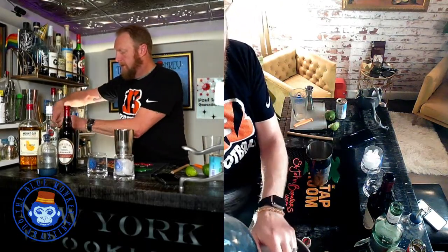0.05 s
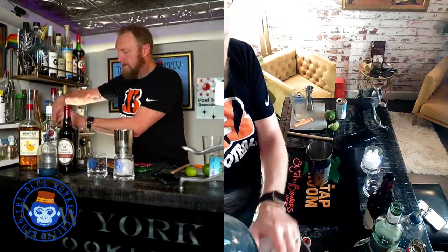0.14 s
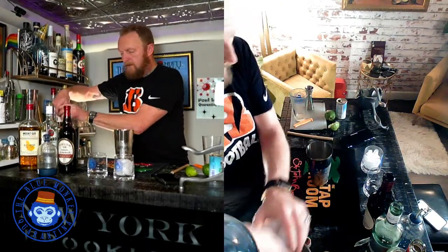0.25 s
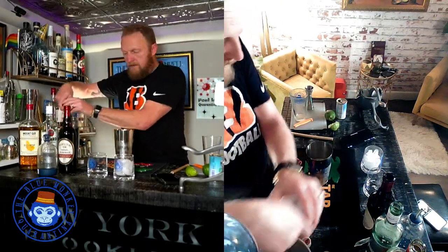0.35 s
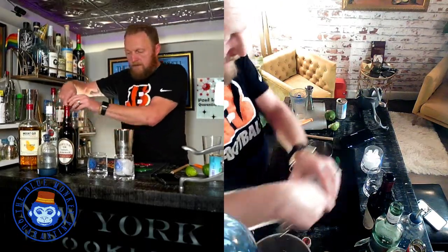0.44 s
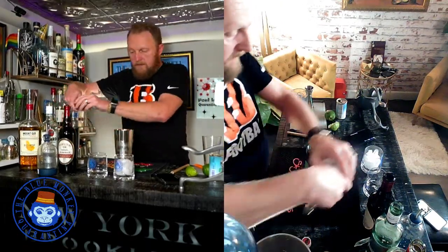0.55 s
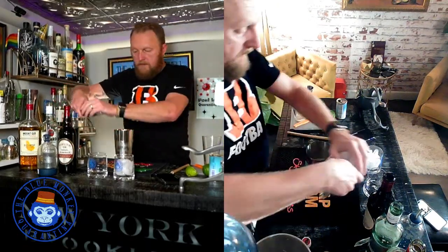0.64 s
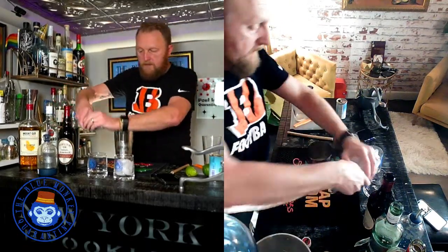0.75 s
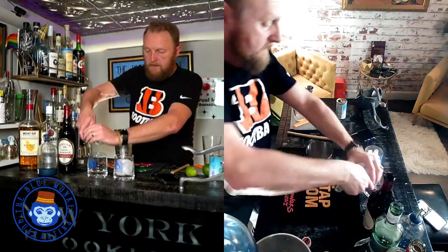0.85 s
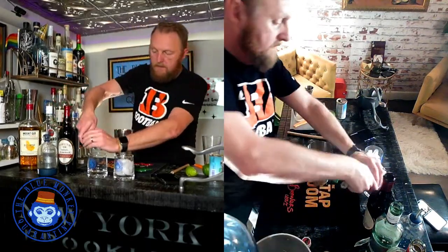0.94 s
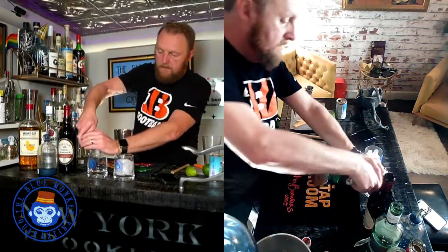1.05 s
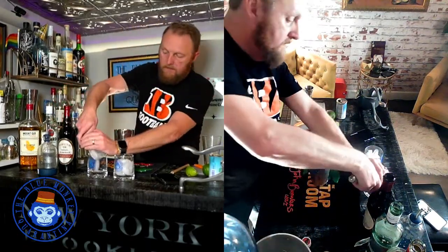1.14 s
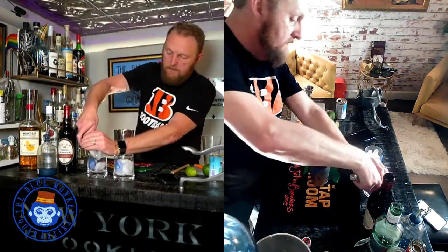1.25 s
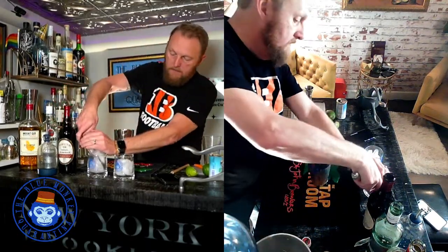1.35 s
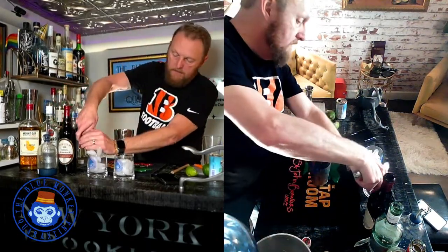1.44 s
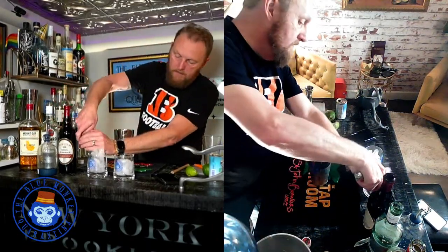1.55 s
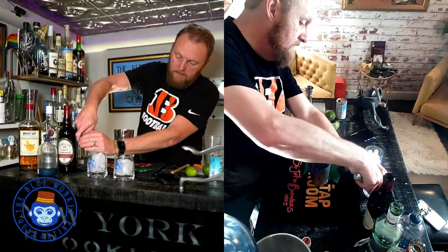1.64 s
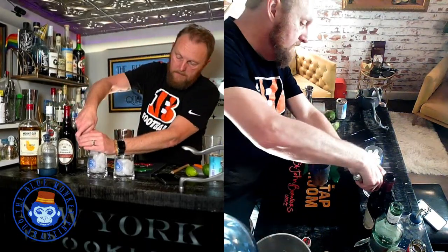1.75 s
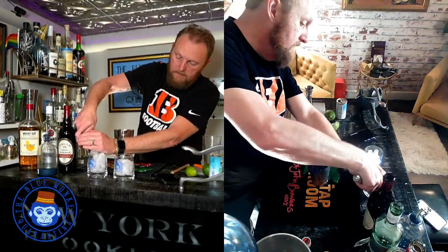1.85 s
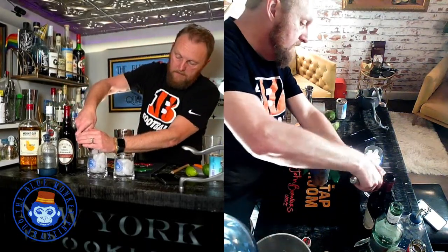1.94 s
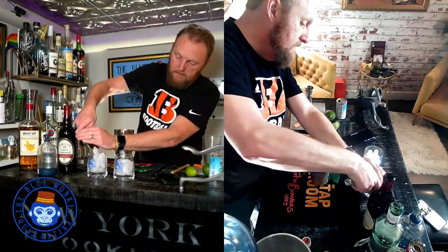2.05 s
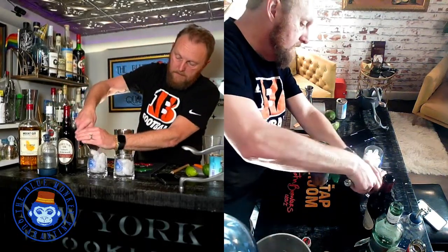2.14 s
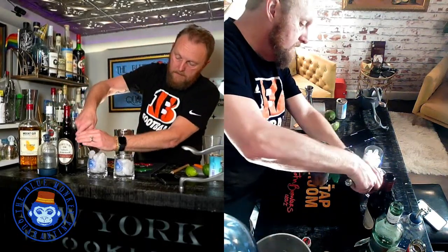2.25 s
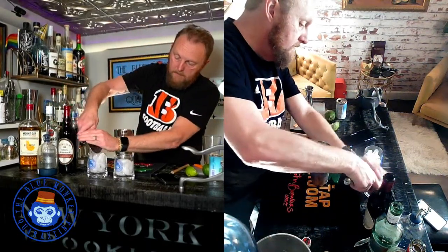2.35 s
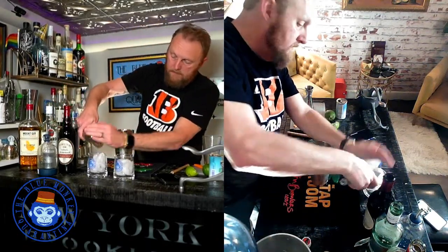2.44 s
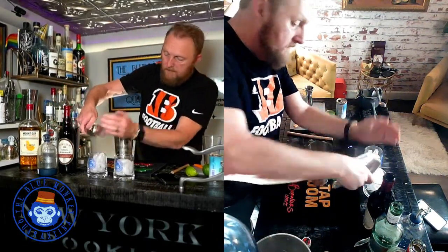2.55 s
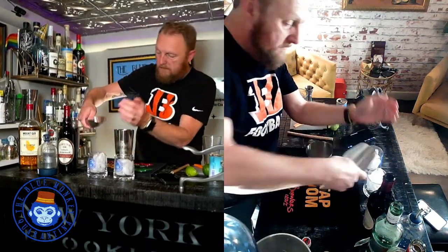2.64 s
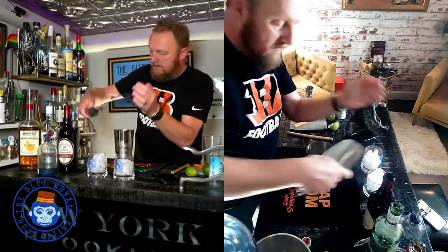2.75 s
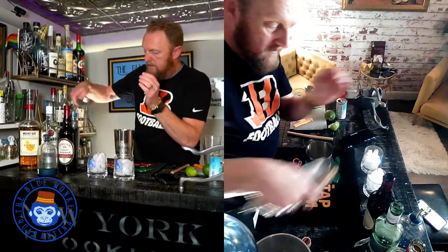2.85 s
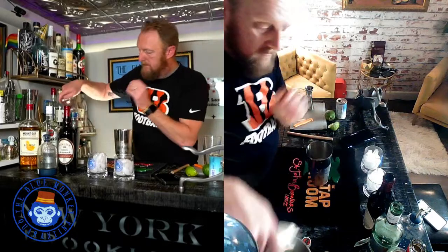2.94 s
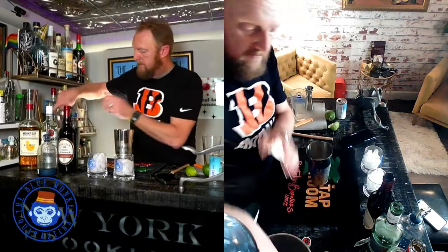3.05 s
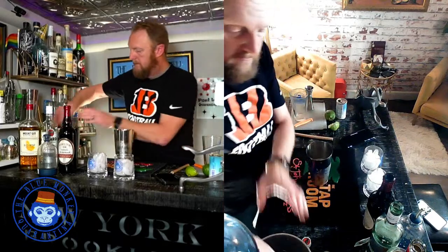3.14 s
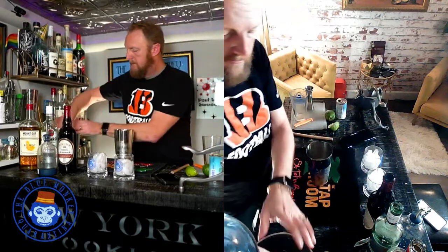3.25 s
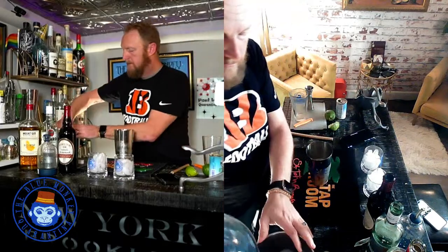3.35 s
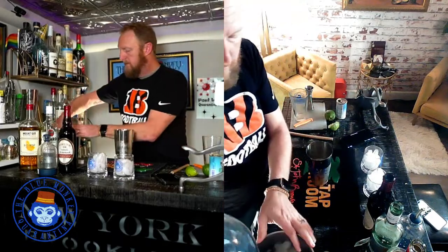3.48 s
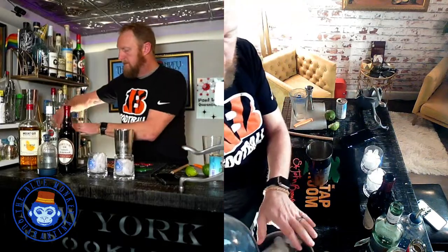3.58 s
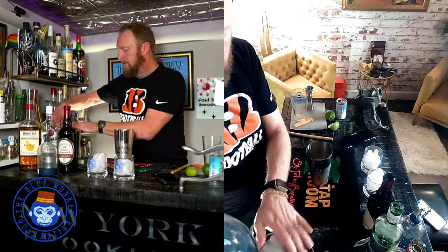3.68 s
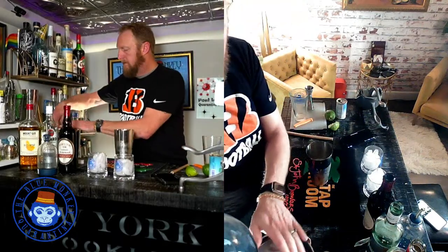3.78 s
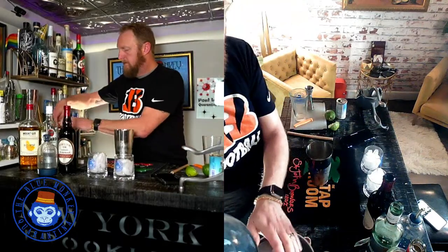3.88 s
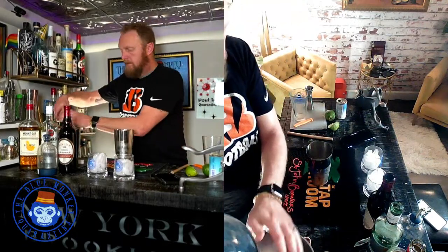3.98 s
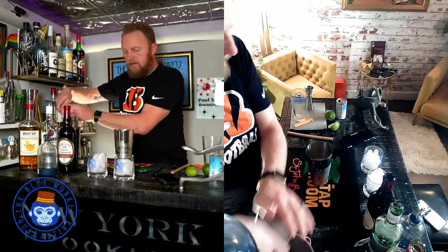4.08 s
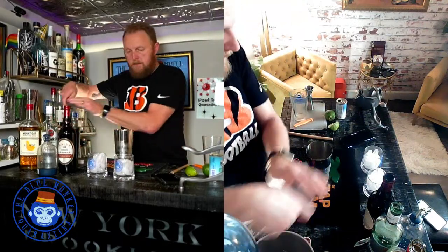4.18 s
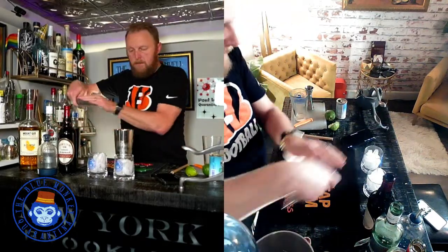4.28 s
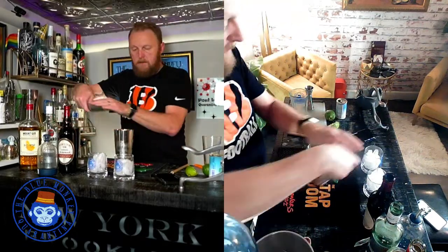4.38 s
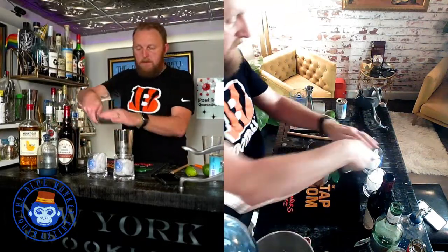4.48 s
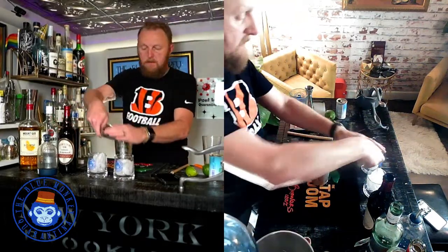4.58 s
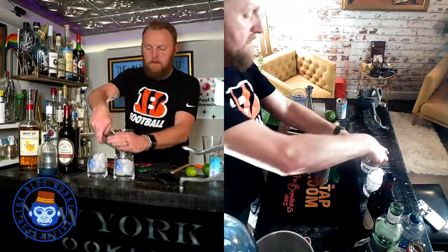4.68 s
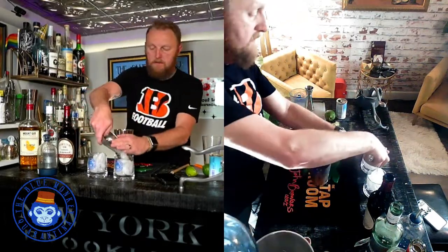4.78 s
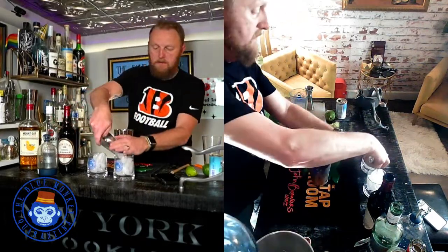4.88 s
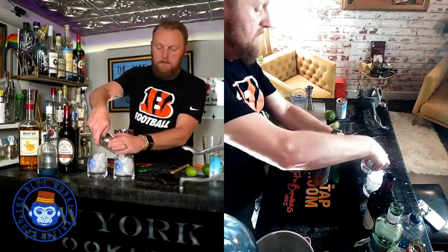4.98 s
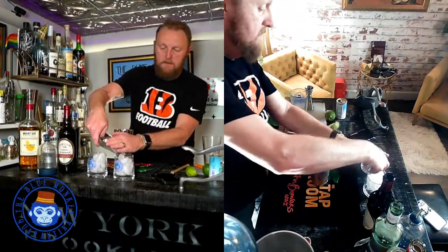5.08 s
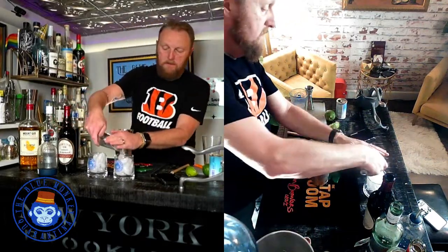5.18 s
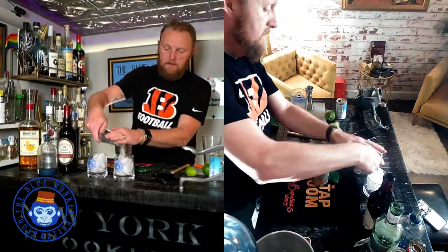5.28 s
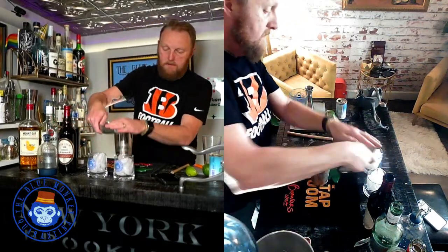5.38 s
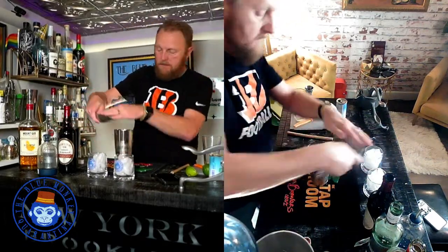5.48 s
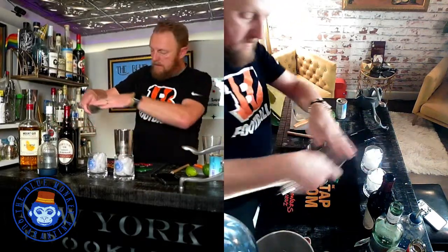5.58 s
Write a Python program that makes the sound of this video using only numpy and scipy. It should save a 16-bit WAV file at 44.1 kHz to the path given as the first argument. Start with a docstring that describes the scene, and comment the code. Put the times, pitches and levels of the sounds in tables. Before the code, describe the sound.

A small, fairly dry room with very faint low room tone, heard close up. At 0 s a fading crunch of ice in a bucket, with small cracks and dull bumps until about 0.45 s. The lifted steel scoop rings thinly and very faintly, until a little ice shifts at 1.15 s. From 1.29 to 1.85 s cubes tumble into a tumbler: hard, bright, irregular clinks over a quick rattle, the first with a hollow knock. Tiny ticks follow, then several more clinks at 2.38-2.64 s, shorter and more damped by the ice. Near quiet until 3.38 s, when the scoop stabs into the ice: a very loud sharp crack, dense metallic crunch and bucket thuds, churning on to about 4.06 s. Sparse, soft ticks of settling cubes lead to 4.98-5.12 s, where a few ringing clinks land in a second glass. Two small ice cracks at 5.2 s, then near silence.

```python
"""In a small room, a bartender digs a steel scoop into a bucket of ice and tips the cubes into tumblers, twice.
Clinks are noise snaps with damped glass modes; rattling and churning are random collisions that drive resonances.
Cracks and knocks excite the modes near their own centre frequency, and the lifted scoop rings freely.
A diffuse tail and a steady room tone surround them; a fast limiter holds the hardest hits."""
import sys
import numpy as np
from scipy import signal
from scipy.fft import rfft, irfft, next_fast_len
from scipy.io import wavfile
from scipy.ndimage import uniform_filter1d, minimum_filter1d

SR = 44100
rng = np.random.default_rng(int(sys.argv[2]) if len(sys.argv) > 2 else 0)


def int16_out(signal):
    """Quantize to a 16-bit WAV file."""
    q = np.round(np.clip(np.atleast_2d(signal).T, -1, 1) * 32767)
    wavfile.write(sys.argv[1], SR, q.astype(np.int16))


N = 247797
TIME = np.arange(N) / SR
HIT = np.arange(SR // 3) / SR  # time axis of one contact

# wall modes of the first tumbler: f/Hz, relative level/dB, t60/s
FIRST_GLASS = [(2563, 0.5, 0.064), (3405, -1, 0.078), (4100, -15.5, 0.054), (4800, -11, 0.1),
               (7310, -8, 0.071), (10410, -17.5, 0.056), (12440, -20, 0.15), (14210, -26.5, .06),
               (14700, -18.5, .075)]
# spectrum of the bucket's low rumble: f/Hz, relative density/dB per Hz
RUMBLE = [(30, -30.5), (60, -15), (85, 10), (170, 1), (250, 3), (330, -17), (430, -13), (650, -13),
          (1300, -58)]


def amp(db):
    """Level definition: a gain is ten to the power dB / 20."""
    return 10 ** (np.asarray(db) / 20)


def unit(x):
    """Normalization: equal mean power, here an rms of 1."""
    return x / np.sqrt(np.mean(x ** 2) + 1e-20)


def along(points, hz):
    """Logarithmic pitch scale: (f/Hz, value) points are read along log frequency."""
    f, v = np.transpose(points)
    return np.interp(np.log(hz + 1), np.log(f + 1), v)


def fade(t, t60):
    """Exponential decay: the level falls 60 dB in t60."""
    return np.exp(-np.log(1000) * t / np.maximum(t60, 1e-3))


def add(track, s, sound):
    """Superposition: a sound is added to the track at time s."""
    part = track[max(round(s * SR), 0):][:len(sound)]
    part += sound[:len(part)]


def filtered(x, response):
    """Linear filtering: the spectrum is multiplied by a frequency response."""
    size = next_fast_len(len(x) + 8192)
    spectrum = rfft(x, size) * response(np.fft.rfftfreq(size, 1 / SR))
    return irfft(spectrum, size)[:len(x)]


def coloured(x, spectrum):
    """Spectral shaping: a tabulated colour is laid on x, at rms 1."""
    return unit(filtered(x, lambda hz: amp(along(spectrum, hz))))


def burst(spectrum, t60):
    """Impact noise: coloured noise that decays exponentially."""
    return coloured(rng.standard_normal(len(HIT)), spectrum) * fade(HIT, t60)


def ring(modes, t, scatter_db, detune):
    """Modal synthesis: damped sines whose strength and tuning vary with the point of contact."""
    hz, db, t60 = np.transpose(modes)[:, :, None]
    size, shift, side = rng.standard_normal((3, len(hz), 1))
    waves = np.sign(side) * np.sin(2 * np.pi * hz * (1 + detune * shift) * t)
    return np.sum(amp(db + scatter_db * size) * waves * fade(t, t60), axis=0)


def resonances(peaks, hz):
    """Forced resonance: band-pass responses (f/Hz, width/Hz, level/dB) sum with alternating sign."""
    total = 0
    for k, (centre, width, db) in enumerate(peaks):
        damping = 1j * hz * width
        total = total + (-1) ** k * amp(db) * damping / (centre * centre - hz * hz + damping)
    return total


def focus(hz, centre_hz, octaves, depth_db):
    """Selective excitation: dB by which a contact favours frequencies around its centre."""
    return depth_db * (np.exp(-(np.log2(hz / centre_hz) / octaves) ** 2) - 1)


def grains(rate, spread_db, t60):
    """Shot noise: random tiny collisions of unequal size, each a short crackle."""
    chance, size, noise = rng.random(N), rng.standard_normal(N), rng.standard_normal(N)
    energy = (chance < rate / SR) * amp(spread_db * np.clip(size, -2, 2)) ** 2
    power = np.abs(signal.fftconvolve(energy, fade(HIT, t60) ** 2)[:N])
    return unit(noise * np.sqrt(power))


def jostle(rate, spread_db, t60, count):
    """Independent resonators: each cube has a pitch of its own and is struck at its own random times."""
    out = np.zeros(N)
    radius = fade(1 / SR, t60)  # pole radius that gives the decay
    for hz in np.geomspace(700, 15000, count) * np.exp(.015 * rng.standard_normal(count)):
        struck = np.flatnonzero(rng.random(N) < rate / SR)
        sizes = np.resize(rng.standard_normal(1024), len(struck))
        blows = np.zeros(N)
        blows[struck] = amp(spread_db * np.clip(sizes, -2, 2))
        poles = [1, -2 * radius * np.cos(2 * np.pi * hz / SR), radius ** 2]
        out += np.sqrt(hz) * signal.lfilter([1, 0, -1], poles, blows)
    return unit(out)


def swells(moves, fall_db_per_s):
    """Addition of powers: (t/s, level/dB, hold/s) movements each rise, hold and die away."""
    attack_s = 0.016  # cubes get moving
    power = np.zeros(N)
    for s, db, hold in moves:
        rise = np.clip((TIME - s) / attack_s, 0, 1)
        power += (rise * amp(db - fall_db_per_s * np.maximum(TIME - s - hold, 0))) ** 2
    return np.sqrt(power)


def clinks():
    """Impact and modal damping: a cube grazes the rim, snaps on the glass, rings its wall, knocks the hollow."""
    # cubes landing in a glass: t/s, blow level/dB, relative ring level/dB
    landings = [(1.2863, -9, -10), (1.3247, -4, 0), (1.4238, -11, 7.5), (1.445, -10.5, 1),
                (1.4518, -10.5, 1), (1.5271, -14, 1), (1.6295, -5, -0.5), (1.642, -10, -7.5),
                (1.7695, -15.5, -2), (1.788, -8.5, -4), (1.8009, -11.5, 10.5), (1.8134, -12.5, 4.5),
                (1.8299, -5, -4), (1.8464, -14, 5), (1.93, -26.5, -8), (2.2004, -28, 13.5),
                (2.235, -28, -4), (2.3266, -36, 19), (2.3621, -31.5, 6.5), (2.3828, -10, 11.5),
                (2.4014, -28.5, 3.5), (2.4332, -12, 2), (2.4606, -13, 2.5), (2.495, -22, -1),
                (2.5178, -31, -0.5), (2.5553, -4.5, -2), (2.594, -11.5, 4.5), (2.6364, -23, 7),
                (4.9799, -4, 6), (4.9867, -19, -4), (5.021, -18, -1), (5.0623, -10, 6), (5.1231, -20.5, -6)]
    # the glass from each time on; cubes against the wall damp it and shift its deepest mode:
    # t/s, ring time ratio, ring level/dB, pitch ratio of the deepest mode, hollow f/Hz
    fills = [(1.1, 1.0, 1.0, 1.003, 770), (1.68, .45, -6.0, 1.01, 830), (2.1, .28, -1.0, .967, 850),
             (2.5, .42, 0.0, 1.007, 920), (4.5, .95, 4.0, 1.0, 930), (5.01, .55, 0.0, .977, 915)]
    # wall modes of the second tumbler: f/Hz, relative level/dB, t60/s
    second_glass = [(2390, 5.5, 0.028), (3140, -3.5, 0.072), (4658, -10, 0.15), (5030, -18, .09),
                    (6840, -6, 0.049), (9700, -21, 0.03), (13600, -20, 0.043)]
    # one cube's snap: f/Hz, relative density/dB per Hz
    ice = [(900, -17.5), (1800, -13), (2450, 2), (3800, -2), (5200, -2), (6200, -16), (7400, -6),
           (9200, -25.5), (10400, -20.5), (15500, -23.5)]
    # the counter under the glass: f/Hz, relative density/dB per Hz
    counter = [(120, -30.5), (250, -2.5), (400, -7.5), (600, -9), (900, -3.5), (1250, -19.5), (2200, -42.5)]
    second_from_s = 3.0
    open_treble_db, damped_treble_db = 2.5, -4  # wall ringing freely; smothered by ice
    first_cube_db = 11  # the first cube falls on the bare bottom and knocks hardest

    out = np.zeros(N)
    contact = 1 - fade(HIT, t60=.0025)  # the blow builds over the contact time
    for cube, (s, db, ring_db) in enumerate(landings):
        _, damping, fill_db, pitch, hollow_hz = [fill for fill in fills if fill[0] < s][-1]
        glass = FIRST_GLASS if s < second_from_s else second_glass
        treble_db = damping * open_treble_db + (1 - damping) * damped_treble_db
        bright = [(7500, 0.0021), (10000, treble_db)]
        modes = []
        for k, (hz, g, t60) in enumerate(glass):
            tuned_hz = hz * (pitch if k == 0 else 1)
            modes.append((tuned_hz, g + along(bright, hz), t60 * damping))
        # the wall gains 1.5 dB per dB of blow, the hollow 0.37: soft blows mostly knock
        wall_db = ring_db + fill_db + .5 * (db + 4.5) - 7.0
        wall = amp(wall_db) * ring(modes, HIT, scatter_db=2.5, detune=.007)
        snap_colour = [(hz, g + along(bright, hz)) for hz, g in ice]
        snap = amp(-8.5) * burst(snap_colour, t60=0.041)
        air = ring([(hollow_hz, -7, .07)], HIT, scatter_db=2, detune=.03)
        hollow_db = -33 + 0.37 * db + first_cube_db * (cube == 0)
        hollow = amp(hollow_db) * (burst(counter, t60=0.11) + air)
        graze = amp(db - 29) * burst(ice, t60=.04)
        add(out, s, contact * (amp(db) * (wall + snap) + hollow))
        add(out, s - .016, graze)
    return out


def rattle():
    """Resonators driven by random contacts: sliding cubes jostle and keep a glass wall faintly ringing."""
    # slides of cubes into a glass: t/s, level/dB, hold/s
    slides = [(1.27, -36, 0.11), (1.43, -34.5, .16), (1.66, -35.5, 0.14), (2.2, -59.5, 0.095),
              (2.33, -81.5, .05), (4.96, -49.5, .16)]
    # colour of the contacts: f/Hz, relative density/dB per Hz
    contact_colour = [(71, -57), (120, -8.5), (251, -9), (630, -9), (805, -4), (911, -15.5), (1750, -22),
                      (2530, -5.5), (2990, -11), (4980, -13), (6240, -22), (7350, -20), (9210, -37.5),
                      (10400, -26.5), (16000, -32.5)]
    crackle = grains(rate=330, spread_db=4, t60=.02)
    heap = jostle(rate=50, spread_db=4, t60=.022, count=60)
    contacts = coloured(crackle + amp(4.5) * heap, contact_colour)
    peaks = [(hz, 70, g) for hz, g, _ in FIRST_GLASS]  # every mode 70 Hz wide
    wall = unit(filtered(contacts, lambda f: resonances(peaks, f)))
    return swells(slides, fall_db_per_s=163.5) * (amp(2.5) * contacts + amp(-7) * wall)


def churn():
    """Resonators driven by random collisions: ploughed cubes sound the steel and rumble in the bucket."""
    # pushes of the scoop that set the cubes moving: t/s, level/dB, hold/s
    pushes = [(-.03, -28, .06), (.09, -36.5, .04), (.37, -42.5, 0.04), (.84, -63.5, .04),
              (1.15, -43.5, .09), (1.24, -39, 0.046), (3.388, -18.5, 0.045), (3.48, -23, .26),
              (3.82, -25, 0.039), (3.93, -31, 0.022), (4.14, -56, 0.036), (4.28, -57.5, 0.045),
              (4.54, -56, .06), (4.65, -53, 0.12), (4.88, -47.5, .09), (5.595, -54.5, .03)]
    # colour of the moving cubes: f/Hz, relative density/dB per Hz
    cube_colour = [(180, -48.5), (300, -12), (405, 4), (494, -3), (787, -16), (1210, 2), (1580, -7),
                   (2700, -2), (3080, -5.5), (3760, -6), (8090, -10), (9240, -20), (16000, -24.5)]
    # resonances of the scoop buried in ice: f/Hz, width/Hz, relative level/dB
    loaded_steel = [(1000, 50, -30), (1340, 7.4, -15), (2030, 88, 3.5), (2700, 100, -10), (3684, 46, 9.5),
                    (4890, 160, 6), (5880, 230, -7), (6000, 53, -17), (8710, 74, -1.5), (10200, 99, -7.5)]
    # the last few cubes in the scoop and bucket keep shifting
    settling = amp(-18.5) * swells(pushes, fall_db_per_s=45)
    effort = np.hypot(swells(pushes, fall_db_per_s=149.5), settling)
    share = effort / effort.max()
    # gentle handling gives separate ticks, hard digging a dense crunch
    rate = 70 + 260 * np.sqrt(share)  # collisions per second
    crackle = unit(grains(rate, spread_db=3.5, t60=.016) / np.sqrt(rate))
    heap = jostle(rate=45, spread_db=4, t60=.05, count=120)
    cubes = coloured(heap + amp(-2) * crackle, cube_colour)
    # gentle handling is duller: above 8700 Hz the level gains 0.19 dB per dB of effort
    air = filtered(cubes, lambda hz: 1 - 1 / (1 + (hz / 8700) ** 10))
    cubes = cubes + air * (amp(4.5) * share ** 0.19 - 1)
    steel = unit(filtered(crackle, lambda hz: resonances(loaded_steel, hz)))
    rumble = coloured(grains(rate=85, spread_db=2.0, t60=0.044), RUMBLE)
    # the bucket rocks as the scoop leaves it
    rocking = swells([(.31, -44, 0)], fall_db_per_s=35)
    heave = amp(-15.5) * effort
    return effort * (amp(-2.5) * cubes + amp(-10.5) * steel) + (heave + rocking) * rumble


def cracks():
    """Brief impact: ice meets steel sharply, and each cube's size sets a pitch of its own."""
    # contacts: t/s, level/dB, centre f/Hz
    contacts = [(.0093, -30.5, 5000), (.2733, -18.5, 8530), (.3412, -21.5, 8500), (.4249, -30, 3320),
                (.602, -38.5, 1780), (.9853, -46, 6510), (2.0441, -36.5, 3300), (2.1783, -35.5, 3930),
                (3.379, -11.5, 3030), (3.3961, 3.5, 2308), (3.4064, 0, 3820), (3.6311, -9, 4430),
                (3.739, -10.5, 10400), (3.905, -9.5, 7000), (4.0596, -20.5, 4240), (4.3556, -36, 3654),
                (4.4819, -28, 3900), (4.6687, -27, 3720), (4.6938, -26, 3890), (4.7311, -24.5, 1930),
                (4.8891, -29.5, 4620), (4.9015, -26.5, 4300), (5.2, -18.5, 3495), (5.2365, -20.5, 4300),
                (5.43, -58.5, 4500)]
    # ice on steel: f/Hz, relative density/dB per Hz
    crunch = [(300, -4.5), (800, -0.5), (1250, 4.5), (2100, -8), (4600, -15), (8200, -11.5), (9500, -20.5),
              (15500, -14.5)]
    # a typical cube's modes: f/Hz, relative level/dB, t60/s
    cube_modes = [(2345, 2.5, .045), (3630, -3, .07), (5230, -3, .08), (7600, 0, .06)]
    out = np.zeros(N)
    for s, db, centre_hz in contacts:
        tilt = lambda hz: focus(hz, centre_hz, octaves=0.9, depth_db=20)
        colour = [(hz, g + tilt(hz)) for hz, g in crunch]
        modes = [(hz, g + tilt(hz), t60) for hz, g, t60 in cube_modes]
        chime = ring(modes, HIT, scatter_db=2, detune=.08)
        crack = amp(-12.5) * burst(colour, t60=0.059) + amp(-16.0) * chime
        add(out, s, amp(db) * crack)
    return out


def knocks():
    """Modal excitation: the scoop bumps the bucket, and where it lands decides which modes speak."""
    # dull knocks on the bucket: t/s, level/dB, centre f/Hz
    bumps = [(.191, -34.5, 645), (0.312, -25, 142), (0.322, -27.5, 570), (.377, -31.5, 510),
             (0.425, -38.5, 184), (3.404, -8, 245), (3.549, -4, 1040), (3.559, -9, 1297),
             (3.738, -25, 159.5)]
    # bucket modes: f/Hz, relative level/dB, t60/s
    bucket_modes = [(93.5, -11.5, .22), (127, -12, 0.15), (176, -0.5, 0.092), (246.8, 3.5, 0.062),
                    (415, -0.5, 0.043), (508.5, -2.5, 0.023), (658, -1.5, 0.062), (959, 0, 0.053),
                    (1070, -2.5, 0.025), (1241, -4.5, 0.061)]
    out = np.zeros(N)
    for s, db, centre_hz in bumps:
        modes = []
        for hz, g, t60 in bucket_modes:
            modes.append((hz, g + focus(hz, centre_hz, octaves=1.22, depth_db=17), t60))
        body = ring(modes, HIT, scatter_db=7, detune=.012)
        thud = burst(RUMBLE, t60=.07)
        add(out, s, amp(db) * (amp(-4.5) * body + amp(-12.5) * thud))
    return out


def scoop():
    """Free vibration and directivity: steel clear of the ice rings on as it turns about the microphone."""
    # steel modes: f/Hz, relative level/dB, t60/s
    steel_modes = [(1121, -13, 2.2), (2807, -12, 1.4), (2849, -1, 1.4), (3747, -5, .5), (4834, -5, 1.0),
                   (6961, -10, .7), (7725, -17, .8), (8716, -9, .45), (9335, -11, .3)]
    # turning to and from the microphone: t/s, gain/dB
    aim = [(.38, -7), (.5, -5), (.66, -2), (.83, 2.5), (.9, 1), (.97, -1), (1.15, 11.5)]
    out = np.zeros(N)
    add(out, .378, amp(-46.5) * ring(steel_modes, TIME, scatter_db=7, detune=0))
    return out * amp(np.interp(TIME, *np.transpose(aim)))


def room(x):
    """Diffuse reverberation: a noise tail with its own decay time at each frequency."""
    # reverberation: f/Hz, t60/s
    decay_times = [(120, .55), (500, 0.33), (3000, 0.092), (8000, 0.17), (15000, 0.05)]
    hz, t, z = signal.stft(rng.standard_normal(SR // 2), SR, nperseg=256)
    decayed = z * fade(t, along(decay_times, hz)[:, None])
    tail = signal.istft(decayed, SR, nperseg=256)[1]
    out = np.zeros(N)
    add(out, .006, signal.fftconvolve(x, tail / np.linalg.norm(tail)))
    return out


def room_tone():
    """Stationary noise: a steady background of fixed colour."""
    # room tone: f/Hz, relative density/dB per Hz
    tone_colour = [(15, -46), (25, -14), (59, -2.5), (141, -12.5), (270, -6.5), (326, -23.5), (373, -11),
                   (796, -19), (863, -18.5), (1330, -25), (16000, -38)]
    return amp(-65.0) * coloured(rng.standard_normal(N), tone_colour)


def scene():
    """Superposition: glasses on the counter, the bucket beside it, their reverberation and the room tone."""
    glasses = clinks() + rattle()
    bucket = churn() + cracks() + knocks() + scoop()
    heard = glasses + bucket + room(amp(-12.0) * glasses + amp(-10.0) * bucket)
    # the deep bass is cut away below 75 Hz
    heard = signal.sosfilt(signal.butter(3, 75, "high", fs=SR, output="sos"), heard)
    return (heard + room_tone())[None]


def record(dry):
    """Peak limiting and band limiting: a fast gain holds the peaks, then the top is cut at 15950 Hz."""
    needed = np.minimum(1, amp(-3.3) / (np.abs(dry[0]) + 1e-9))
    # lowest gain in 129 samples, smoothed over as many
    gain = uniform_filter1d(minimum_filter1d(needed, size=129), size=129)
    return filtered(dry[0] * gain, lambda hz: hz < 15950)[None]


dry = scene()
out = record(dry)
int16_out(out)
```